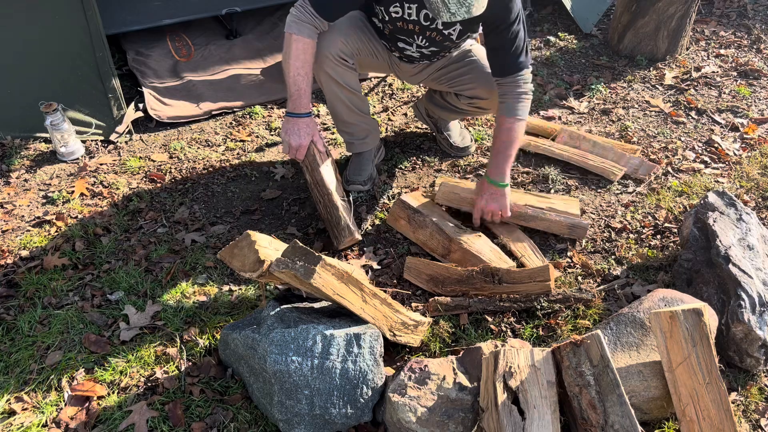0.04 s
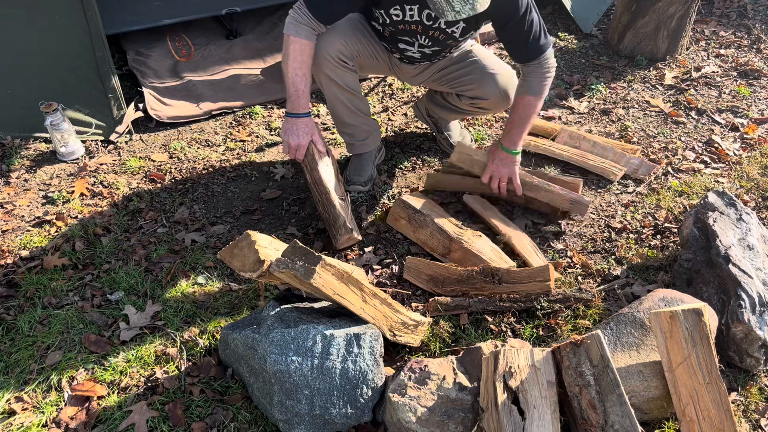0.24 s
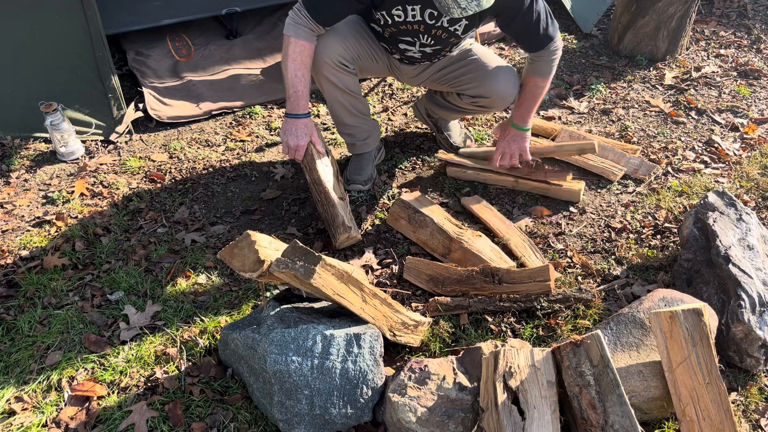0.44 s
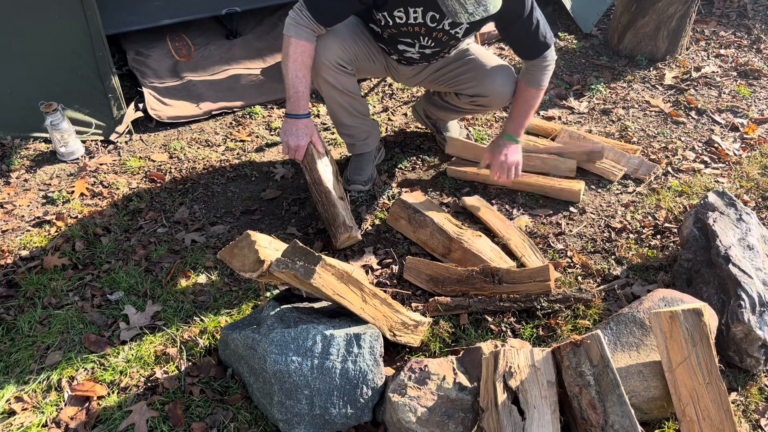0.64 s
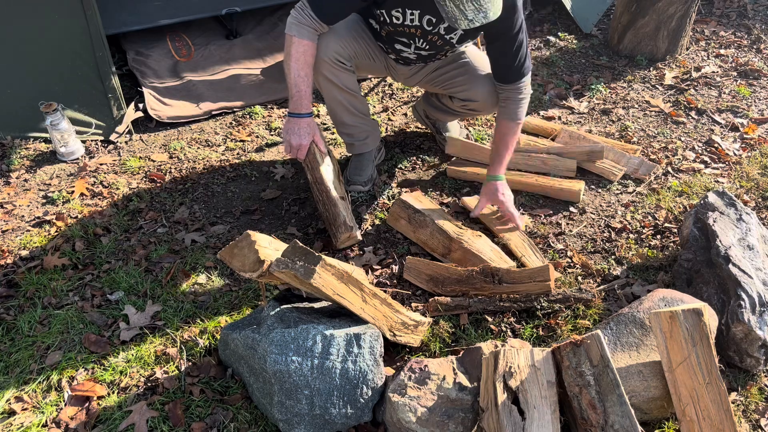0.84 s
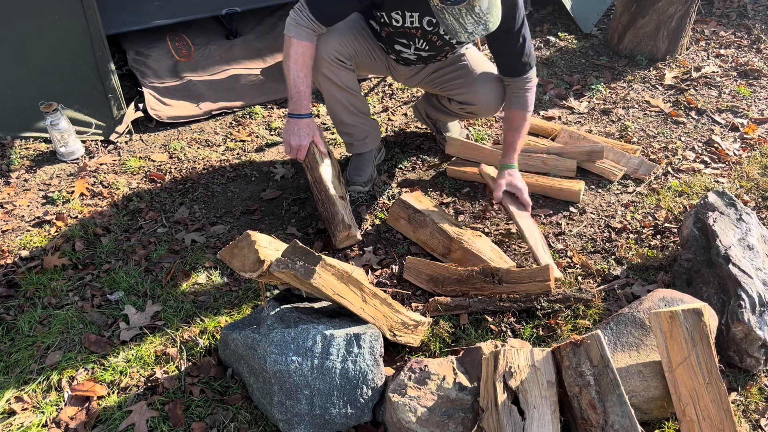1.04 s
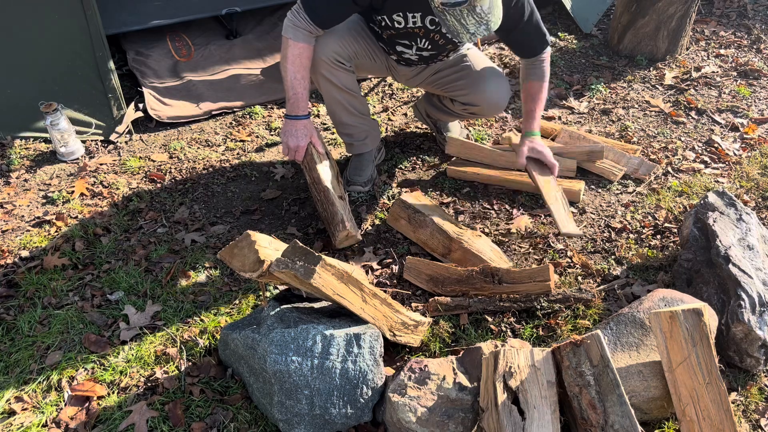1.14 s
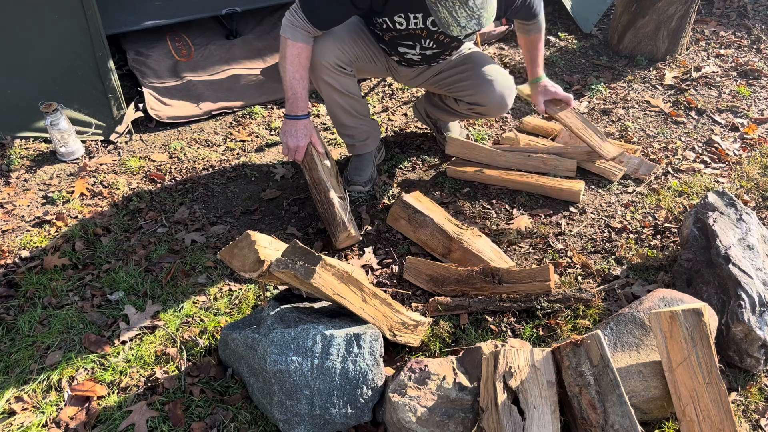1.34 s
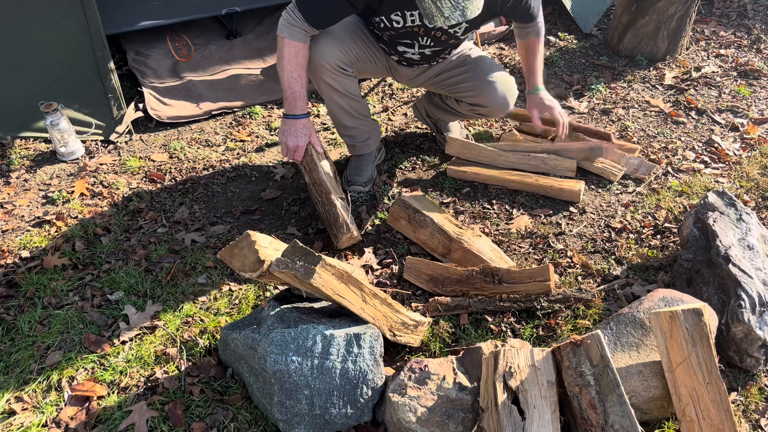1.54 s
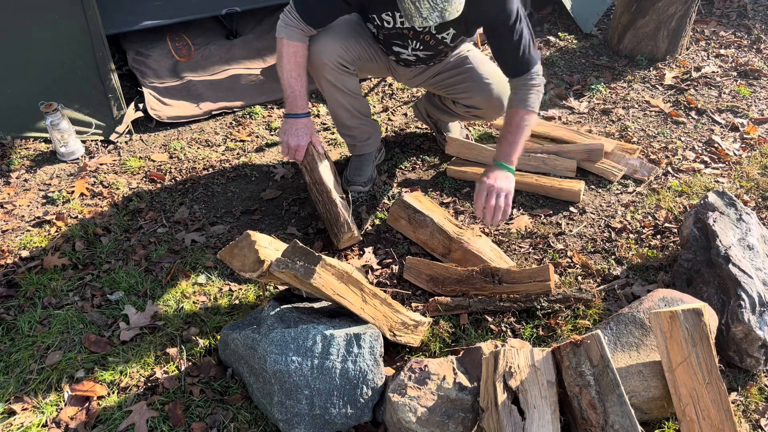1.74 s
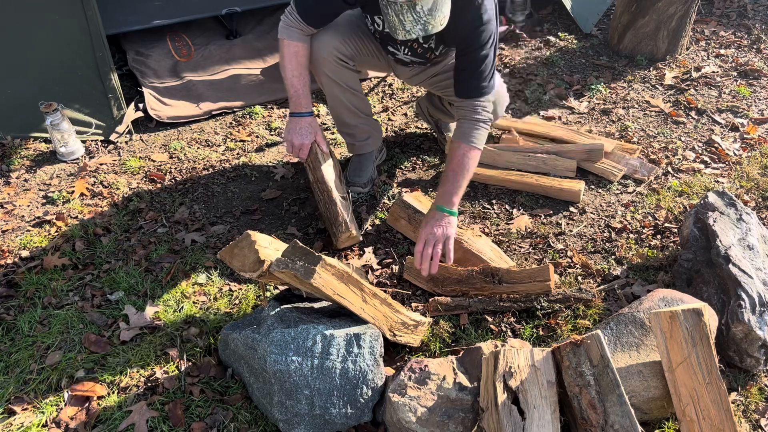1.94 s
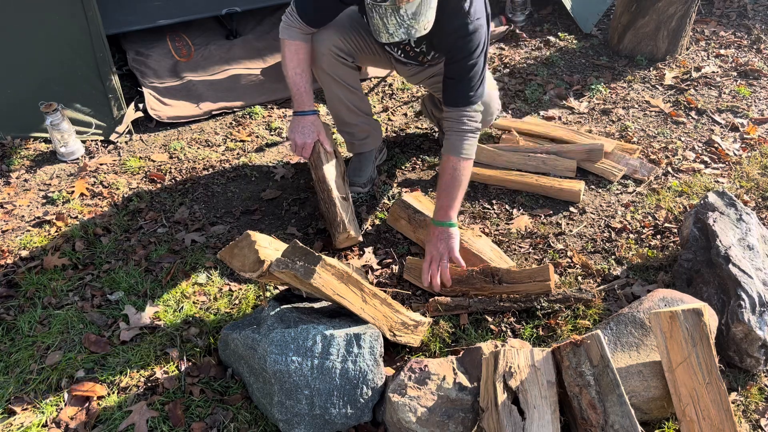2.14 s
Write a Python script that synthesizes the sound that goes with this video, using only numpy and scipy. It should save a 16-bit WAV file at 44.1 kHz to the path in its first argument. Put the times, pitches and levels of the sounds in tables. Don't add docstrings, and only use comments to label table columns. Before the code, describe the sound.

Firewood pieces drag off a pile, knock hard and slide against others, one rolling. After a quiet rustling gap, another piece lands end after end and settles. Outdoors on dry leaves, heard close, with short dull echoes.

```python
import sys
import numpy as np
from scipy import signal
from scipy.io import wavfile

SR = 44100
rng = np.random.default_rng(int(sys.argv[2]) if len(sys.argv) > 2 else 0)


def invert_db(x):
    u = np.asarray(x, float) / 20
    return 10 ** u


def transcribe(signal):
    frames = np.atleast_2d(signal).T
    limited = np.clip(frames, -1, 1)
    pcm = np.round(limited * 32767).astype(np.int16)
    wavfile.write(sys.argv[1], SR, pcm)


N = 97020

# (pitch [Hz], level [dB], time to fade by 60 dB [s])
THIN_PIECE = [(603.8, -35, 0.0207), (1470, 5, 0.022), (1551, 5, 0.014), (1050, -27.5, 0.036),
              (2200, -20, 0.043), (2875, -15.5, 0.029)]
THIN_SLIDING = [(623.5, -4.5, 0.016), (1060, -6, 0.015), (1470, 0.5, 0.069), (2240, -13, 0.058),
                (2630, -8.5, 0.017)]
PAIR_ON_PILE = [(385, -43, 0.024), (666, -1.5, 0.022), (1050, -8.5, 0.13), (1150, -6.5, 0.021),
                (1803, 2.5, .025), (1970, -19, 0.03)]
ROLLING_PIECE = [(446, -22, 0.23), (695, -7, 0.033), (958, -2, 0.02), (1094.5, 1, 0.054),
                 (1355, -10, 0.075), (1440, -9, 0.052)]
NEAR_END = [(485, -5, 0.045), (770, -23, 0.047), (1053, -8, 0.12), (1211, -6.5, 0.036), (1592, -4.5, 0.015),
            (2060, -3.5, 0.0067)]
FAR_END = [(305, -12.5, 0.026), (726, -4.5, 0.12), (727, 6, 0.021), (1004, 4.5, 0.016), (1303, -3.5, 0.032),
           (1900, -12.5, 0.047)]
# (time [s], level [dB])
THIN_KNOCKS = [
    (0.4044, -2),
    (0.4101, -10.5),
    (0.4207, -28.5),
]
SLIDE_KNOCKS = [
    (0.4544, -19),
    (0.4567, -27.5),
    (0.4624, -27),
    (0.468, -30),
    (.473, -29),
    (0.521, -36.5),
]
PAIR_KNOCKS = [
    (.5455, -20.5),
    (.548, -17.5),
    (.5525, -36.5),
]
ROLL_KNOCKS = [
    (0.6861, -19),
    (.702, -33.5),
]
NEAR_KNOCKS = [
    (1.4598, -19),
    (1.4628, -27),
    (1.467, -40.5),
]
FAR_KNOCKS = [
    (1.5525, -23),
    (1.5538, -15),
    (1.558, -54),
    (1.626, -43.5),
]
CONTACT_MS = [.25, .2, 0.34, 0.38, 0.16, 0.21]
# (time [s], level [dB], pitch [Hz])
TAPS = [(0.021, -30, 1700), (0.024, -24.5, 781), (0.044, -45, 1050), (0.078, -41.5, 680),
        (0.112, -37.5, 767), (0.122, -33, 1100), (0.141, -35, 720), (0.16, -39.5, 1160), (0.193, -42, 694),
        (0.21, -35, 1680), (0.235, -23.5, 1060), (0.244, -27, 1470), (0.296, -28, 895), (0.302, -29, 1520),
        (1.679, -33, 715), (1.72, -43, 422), (1.837, -54.5, 285), (2.032, -48.5, 285)]
TAP_RATIOS = [.55, 1.4, 1.95, 2.7]
TAP_OVERTONE_DB = [-22, -5.5, -14.5, -11]
# (time [s], level [dB], length [s], dull part against crisp [dB])
CRUNCHES = [(0.042, -27.5, 0.0066, -4.5), (0.077, -31.5, 0.015, -4), (0.107, -21.5, 0.022, -9.5),
            (0.115, -17, .002, -17), (0.179, -27, 0.023, -3.5), (0.224, -15.5, 0.0096, -17),
            (.233, -27.5, 0.0085, 1), (0.245, -38, 0.013, 7), (0.268, -24, 0.0056, -21),
            (0.294, -31.5, 0.021, -5.5), (0.399, -27, 0.004, 7), (0.404, -12.5, 0.012, -8.5),
            (0.433, -21.5, 0.0082, -8.5), (0.441, -26.5, 0.0067, -4.5), (.453, -17, 0.014, -2.5),
            (0.506, -30.5, 0.013, -6.5), (0.52, -36, 0.021, -0.5), (.545, -17, 0.0087, -0.5),
            (0.685, -33, 0.01, 5), (1.460, -25.5, 0.0069, 4), (1.47, -42, 0.022, -10),
            (1.551, -36.5, 0.029, -1.5), (1.576, -39, 0.048, -8), (1.673, -43, 0.017, -3),
            (1.693, -51, 0.052, -12), (1.938, -59, 0.05, -0.5), (2.131, -46.5, 0.037, -10)]
# (pitch [Hz], level [dB per Hz])
CRISP = [(2650, -59.5), (4500, -23.5), (10400, -7.5), (13100, -6.5), (14300, 5.5), (15900, -0.5)]
# (pitch [Hz], level [dB per Hz])
DULL = [(130, -9.5), (350, -1.5), (800, 4), (1700, 2), (2600, -8), (3800, -3.5), (5500, -27.5),
        (8000, -10.5)]
# (time [s], level [dB])
DRAG = [(0.0, -47.5), (.13, -47), (.25, -46), (.32, -56.5), (.345, -67), (.6, -74.5), (.66, -60.5),
        (.72, -66.5)]
# (time [s], level [dB])
SETTLE = [(1.545, -90), (1.56, -45.5), (1.63, -68.5), (1.65, -59.5), (1.74, -54.5), (1.77, -88)]
# (pitch [Hz], width [Hz], level [dB])
DRAGGED = [(405, 150, -2), (730, 132, 0.5), (1115, 46, 2), (1488, 200, -3.5), (2373, 340, -20.5),
           (3360, 400, -12)]
# (time [s], level [dB], pitch [Hz])
TICKS = [(1.398, -45, 8800), (1.4, -50, 13840), (1.661, -55, 6370), (1.916, -48.5, 5670)]
# (time [s], level [dB])
RUSTLE = [(0.0, -48), (.2, -46.5), (.36, -50.5), (.39, -58), (.62, -58), (.76, -72), (.9, -63), (1.03, -54),
          (1.17, -59.5), (1.3, -57), (1.37, -64), (1.39, -68), (1.53, -63.5), (1.72, -64.5), (1.79, -73),
          (1.95, -58), (2.07, -68), (2.2, -66)]
# (pitch [Hz], level [dB per Hz])
CLOTH = [(240, -42), (400, -14.5), (788, -12), (2150, -15), (7950, -18.5), (14300, -4), (15900, -11)]
AIR = [(88, -28), (150, -4.5), (406, -6.5), (4930, -19.5), (8520, -26), (14400, -23.5), (15900, -16)]
RUMBLE = [(12, -32), (20, 14), (48, 3.5), (81, 7), (155, -6), (300, -14), (390, -31), (660, -120)]


def contact(s, db, ms):
    t = (np.arange(N) / SR - s) * 1000 / ms
    bump = np.where(np.abs(t - 0.5) < 0.5, np.sin(np.pi * t) ** 2, 0)
    return invert_db(db) * bump * 2000 / (ms * SR)


def ring(push, hz, t60):
    r = invert_db(-60 / (t60 * SR))
    w = 2 * np.pi * hz / SR
    return signal.lfilter([0, np.sin(w)], [1, -2 * r * np.cos(w), r * r], push + 1e-18)


def piece(modes, knocks, ms):
    push = sum(contact(s, db, ms) for s, db in knocks)
    out = np.zeros(N)
    for k, (hz, db, t60) in enumerate(modes):
        out += (-1) ** k * invert_db(db) * ring(push, hz, t60)
    return out


def knocks():
    pieces = [(THIN_PIECE, THIN_KNOCKS), (THIN_SLIDING, SLIDE_KNOCKS), (PAIR_ON_PILE, PAIR_KNOCKS),
              (ROLLING_PIECE, ROLL_KNOCKS), (NEAR_END, NEAR_KNOCKS), (FAR_END, FAR_KNOCKS)]
    return sum(piece(modes, hits, ms) for (modes, hits), ms in zip(pieces, CONTACT_MS))


def taps():
    contact_ms, t60_s = 0.36, 0.045
    out = np.zeros(N)
    chance = rng.standard_normal((len(TAPS), 8))
    for (s, db, hz), c in zip(TAPS, chance):
        push = contact(s, db, contact_ms)
        out += ring(push, hz, t60_s)
        for k, (ratio, part_db) in enumerate(zip(TAP_RATIOS, TAP_OVERTONE_DB)):
            part_hz = hz * ratio * (1 + 0.07 * c[k + 4])
            out += invert_db(part_db + 4.3 * c[k]) * ring(push, part_hz, 0.2 * t60_s)
    return out


def crunches():
    rise_s, fall_s, tail_s, tail_db, all_db = 0.0023, 0.0019, 0.016, -14, -12
    t = np.arange(N) / SR
    crisp, dull = np.zeros(N), np.zeros(N)
    for s, db, length, dull_db in CRUNCHES:
        after = np.maximum(t - s - length, 0)
        fall = np.exp(-after / fall_s) + invert_db(tail_db) * np.exp(-after / tail_s)
        shape = np.clip((t - s) / rise_s, 0, 1) * fall
        crisp += (invert_db(db + all_db) * shape) ** 2
        dull += (invert_db(db + all_db + dull_db) * shape) ** 2
    cracks = grains(per_s=15000, spread_db=2.5)
    leaves = np.sqrt(crisp) * colour(cracks, CRISP, patchy_db=2.5, speed=60)
    bark = np.sqrt(dull) * colour(cracks, DULL, patchy_db=3.0, speed=60)
    return leaves + bark


def drag():
    level_db, = in_time([*DRAG, *SETTLE])
    slips = grains(per_s=1400, spread_db=4.5) * invert_db(3.0 * drift(17))
    wood = np.zeros(N)
    for k, (hz, width, db) in enumerate(DRAGGED):
        wood += (-1) ** k * invert_db(db) * np.sqrt(width) * ring(slips, hz, 2.2 / width)
    no_deep_bass = signal.lfilter([1, -1], [1, -0.97], wood)
    return invert_db(level_db) * rms_one(no_deep_bass)


def ticks():
    out = np.zeros(N)
    for s, db, hz in TICKS:
        push = contact(s, db, 0.039) - contact(s + 0.0017, db + 1.5, 0.067)
        out += ring(push, hz, 0.0047)
    return out


def echoes(x):
    ground_s, ground_db, scatter_db, scatter_t60_s, cut_hz = 0.0028, -20, -15, 0.16, 1220
    t = np.arange(SR // 3) / SR
    fade = invert_db(-60 * t / scatter_t60_s) * np.clip(t / 0.012, 0, 1)
    scatter = rng.standard_normal(len(t)) * fade
    scatter = signal.lfilter(*signal.butter(2, cut_hz, fs=SR), scatter)
    strength = np.sqrt(np.sum(scatter ** 2) * SR / 2 / cut_hz)
    ground = invert_db(ground_db) * np.pad(x, (int(ground_s * SR), 0))[:N]
    return ground + invert_db(scatter_db) * signal.fftconvolve(x, scatter / strength)[:N]


def rustle():
    level_db, = in_time(RUSTLE)
    swell = invert_db(level_db + 1.5 * drift(20))
    return swell * colour(grains(per_s=12000, spread_db=2.5), CLOTH, patchy_db=-2.5, speed=12)


def air():
    return invert_db(-70.5) * colour(rng.standard_normal(N), AIR, patchy_db=-0.93, speed=11)


def rumble():
    deep = colour(rng.standard_normal(N), RUMBLE, patchy_db=2.5, speed=4)
    return invert_db(-59.5) * deep[::-1]


def rms_one(x):
    return x / np.sqrt(np.mean(x ** 2) + 1e-20)


def in_time(rows):
    s, *columns = np.transpose(rows)
    return [np.interp(np.arange(N) / SR, s, c) for c in columns]


def drift(rate):
    r = np.exp(-80 * np.pi * rate / SR)
    noise = rng.standard_normal(N // 40 + 2002)
    slow = signal.lfilter([1], [1, -2 * r, r * r], noise)[2000:]
    return np.interp(np.arange(N) / 40, np.arange(len(slow)), rms_one(slow))


def colour(x, spectrum, patchy_db=0., speed=10):
    hz, db = np.transpose(spectrum)
    edges = 20 * 2 ** np.arange(0, 10.1, 0.4)
    out = np.zeros(N)
    for k, (low, high) in enumerate(zip(edges, edges[1:])):
        mid = np.sqrt(low * high)
        flicker = drift(speed)
        if hz[0] / 1.2 < mid < hz[-1] * 1.2:
            sos = signal.butter(2, [low, min(high, 0.45 * SR)], "band", fs=SR, output="sos")
            level_db = np.interp(np.log(mid), np.log(hz), db) + patchy_db * flicker
            out += (-1) ** k * signal.sosfilt(sos, x) * invert_db(level_db)
    return rms_one(out)


def grains(per_s, spread_db):
    size = invert_db(spread_db * np.minimum(rng.exponential(1, N), 5)) * rng.choice([-1, 1], N)
    return size * (rng.random(N) < per_s / SR) + 1e-18


def scene():
    high_pass = signal.butter(2, 200, "high", fs=SR, output="sos")
    wood = signal.sosfilt(high_pass, knocks() + taps())
    near = wood + crunches() + drag() + ticks()
    return (near + echoes(near) + rustle() + air() + rumble())[None]


def roll_off(x):
    return signal.sosfilt(signal.butter(12, 16480, fs=SR, output="sos"), x)


def record(dry):
    low_pass = signal.ellip(8, 1, 28, 15850, fs=SR, output="sos")
    mix = signal.sosfilt(low_pass, dry)
    return roll_off(mix)


dry = scene()
out = record(dry)
transcribe(out)
```